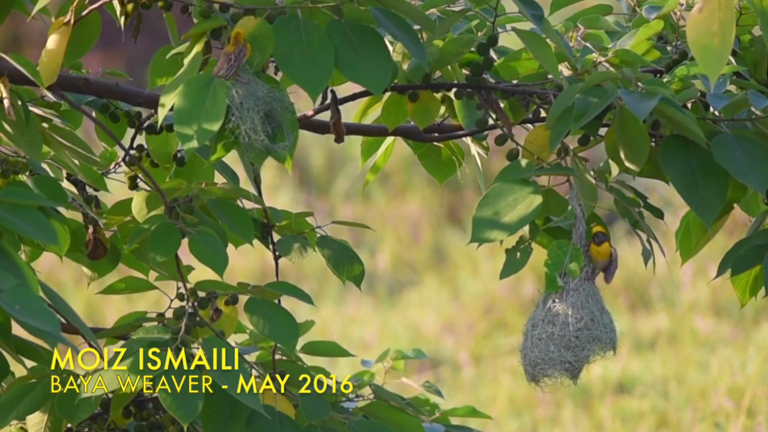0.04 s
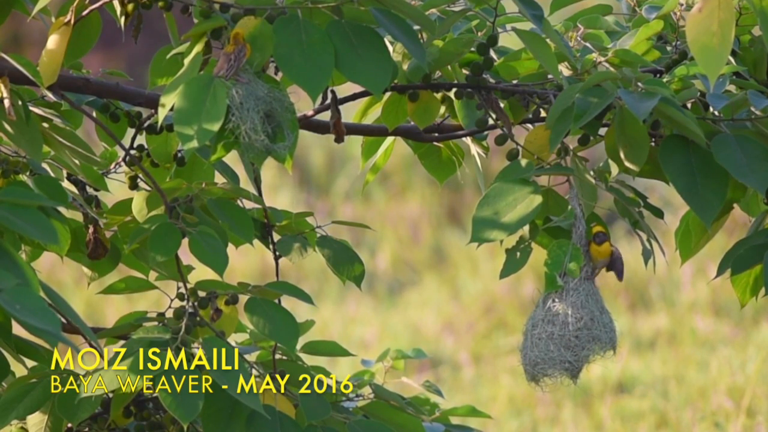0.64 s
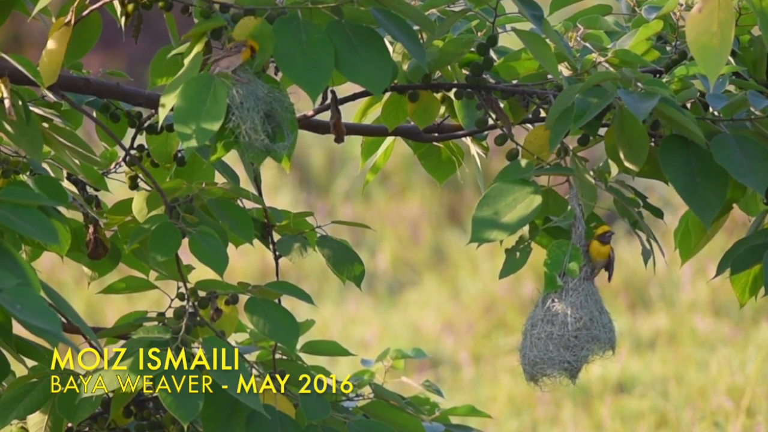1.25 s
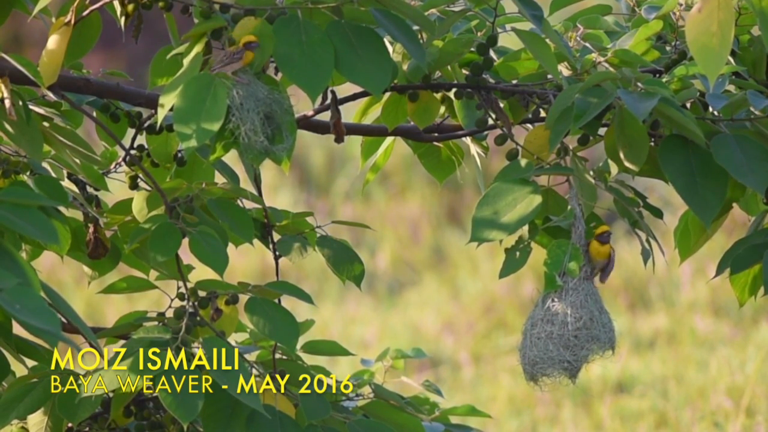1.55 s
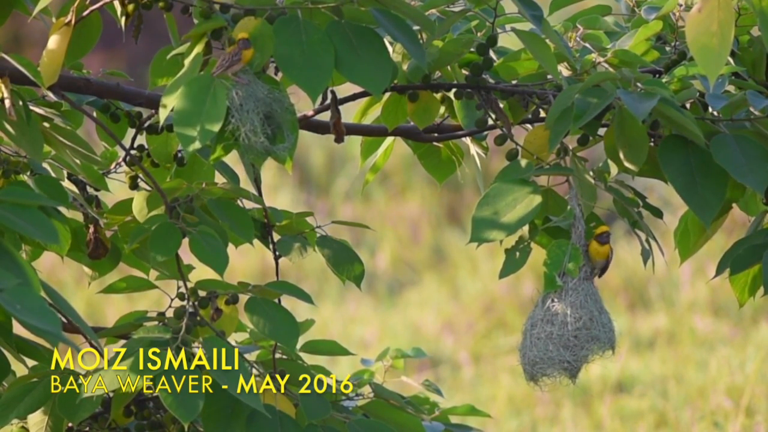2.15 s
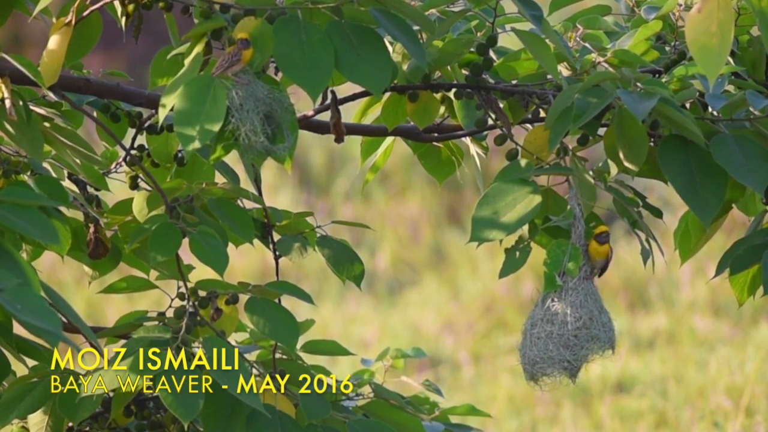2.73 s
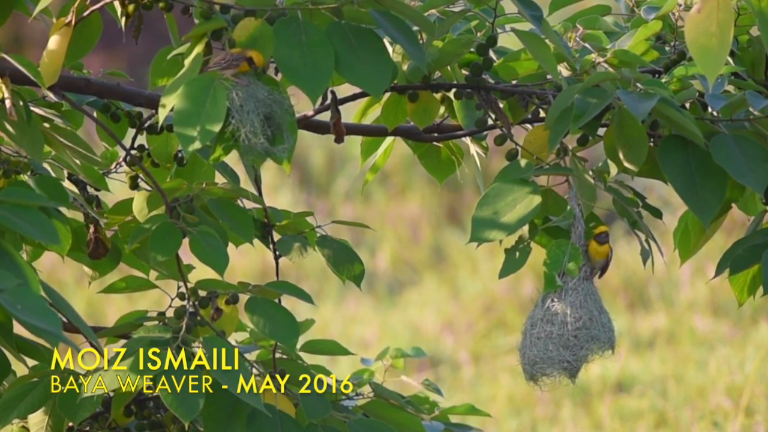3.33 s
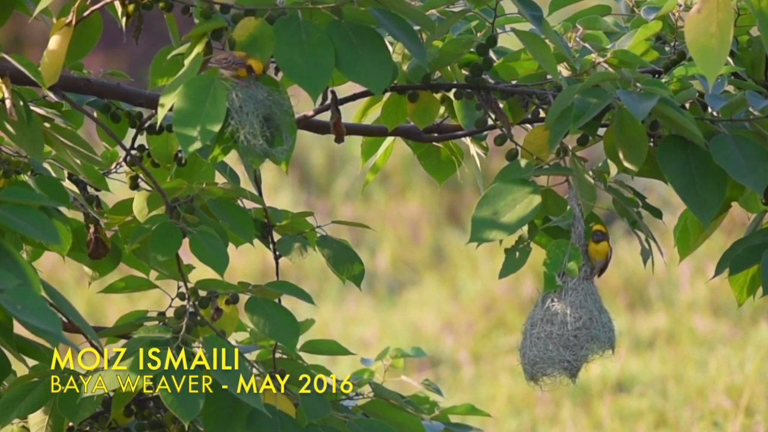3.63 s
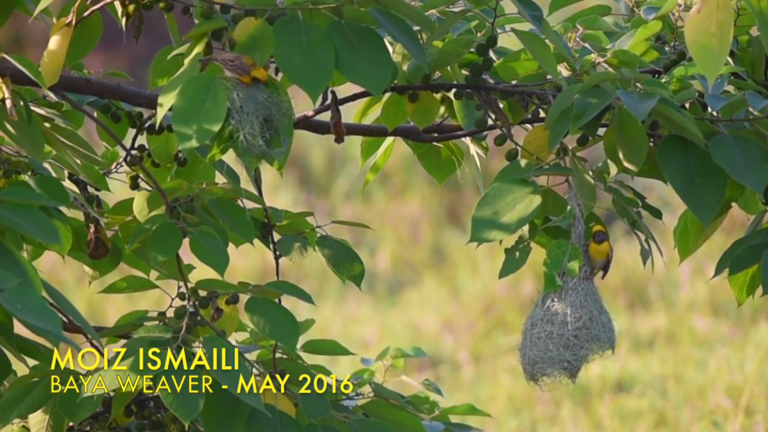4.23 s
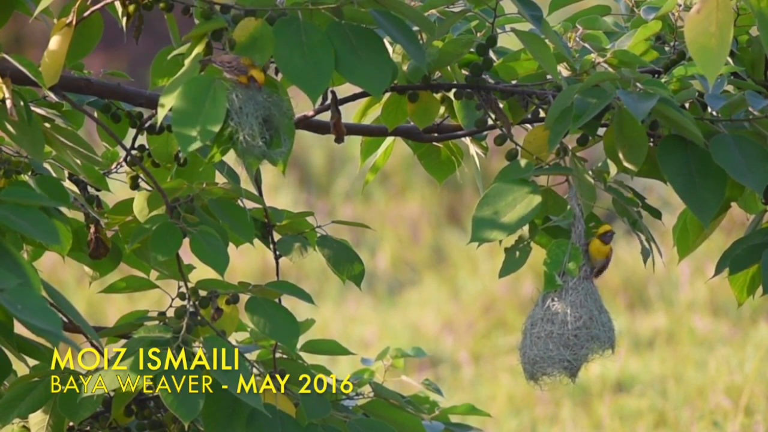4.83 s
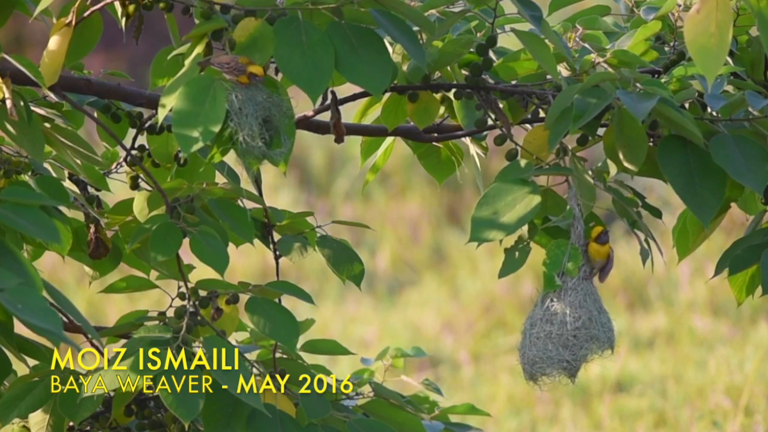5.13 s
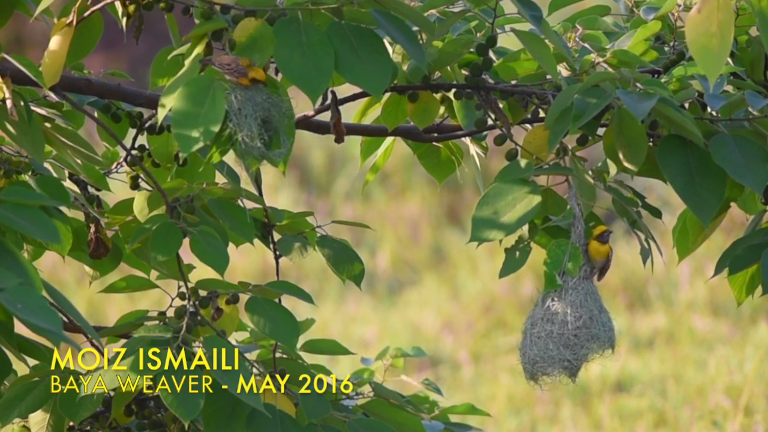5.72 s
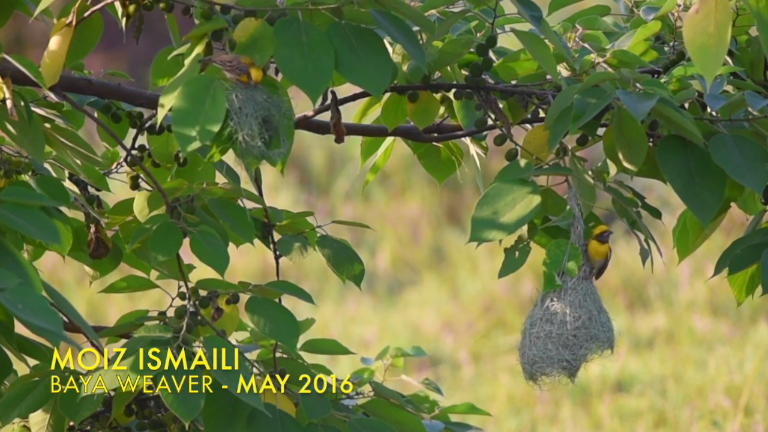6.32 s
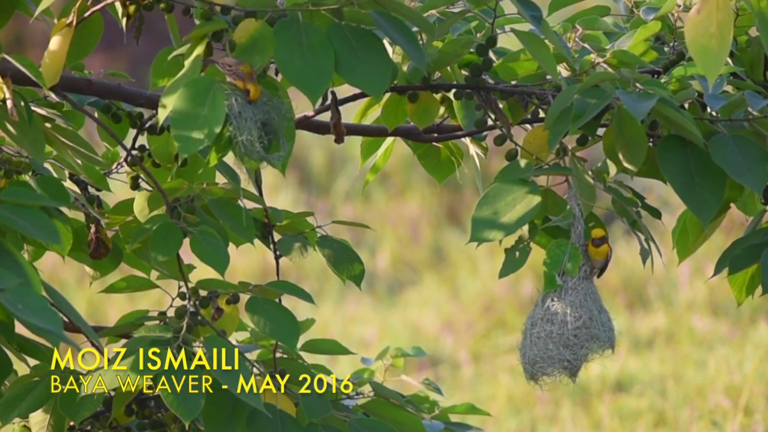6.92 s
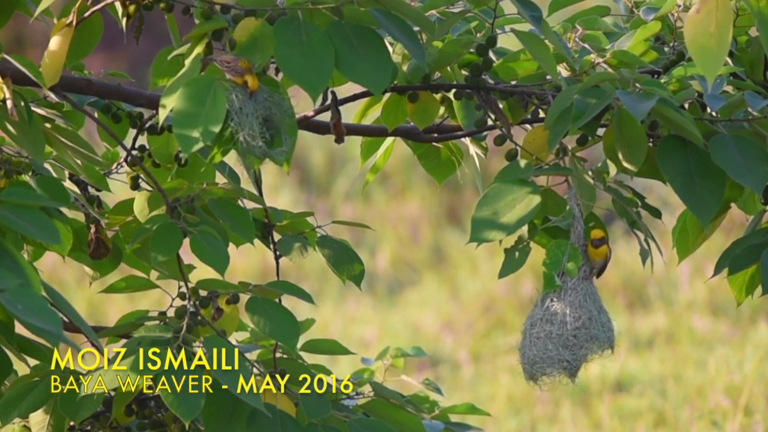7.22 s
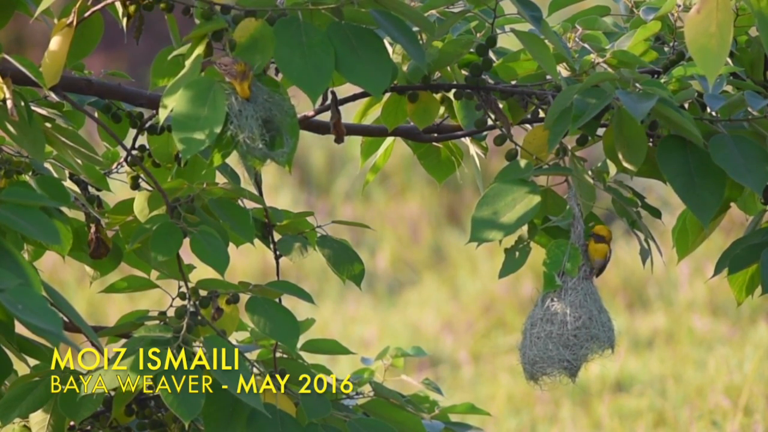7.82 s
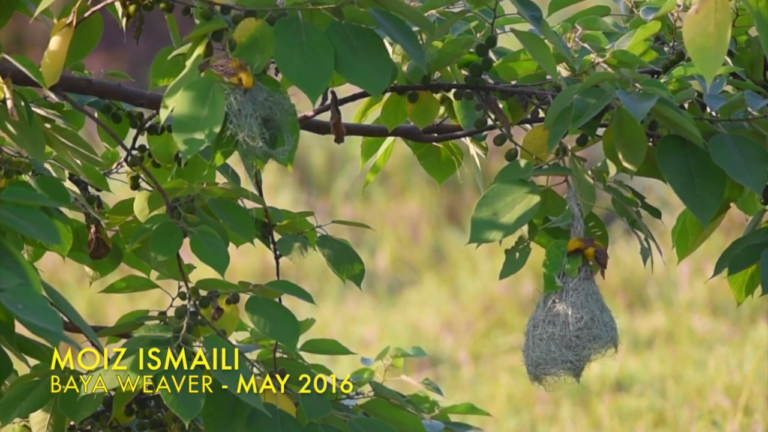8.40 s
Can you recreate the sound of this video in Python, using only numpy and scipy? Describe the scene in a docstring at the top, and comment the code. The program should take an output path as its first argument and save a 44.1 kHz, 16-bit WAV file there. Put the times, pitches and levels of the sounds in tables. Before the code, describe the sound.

Small birds chirp, rasp and twitter in a tree over distant traffic rumble, with camera shutter clicks and a couple of twig snaps.

```python
"""Weaver birds chirp, rasp, twitter and whistle in a leafy tree, with more of them further off.
Each sings with its syrinx, a two-sided voice box: one tone makes a clear note, two mixed make a rasp.
Leaves and branches scatter the calls. A stills camera fires two short bursts as small parts clack
inside its body, and dry twigs snap and tick close by. A high hiss swells: first rustling leaves, later
the breathy treble of the loud calls. Far traffic hums, rumbles and hisses below, and two motors rev up."""
import sys
import numpy as np
from scipy import signal
from scipy.fft import rfft, irfft, next_fast_len
from scipy.io import wavfile
from scipy.ndimage import uniform_filter1d

SR = 44100
rng = np.random.default_rng(int(sys.argv[2]) if len(sys.argv) > 2 else 0)


def waveform_to_disk(signal):
    """Save audio, clipped to [-1, 1], as 16-bit WAV at the path in sys.argv[1]."""
    frames = np.transpose(np.atleast_2d(signal))
    scaled = np.clip(frames, -1, 1) * 32767
    samples = np.round(scaled).astype(np.int16)
    wavfile.write(sys.argv[1], SR, samples)


N = 373086
T = np.arange(N) / SR

# A "colour" says how strong a sound is at each frequency, from low to high.
# colour of the outdoor hiss: f/Hz, level/dB
AIR_COLOUR = [(150, -29), (250, -3.5), (342, -11.5), (607, -9), (988, -6), (1240, -11.5), (2320, -16.5),
              (2670, -16.5), (4120, -23), (5160, -22.5), (5730, -15), (6590, -23), (9830, -15.5),
              (11700, -33), (16000, -35)]
# how much that hiss differs between the ears: f/Hz, level/dB against the part they share
AIR_WIDTH = [(60, -57), (110, -50), (200, -50), (380, -17), (700, -16.5), (1290, -5), (2380, 0), (4400, 2),
             (8120, 1.5), (15000, 1)]
# narrow bands of extra hiss: f/Hz, width/Hz, level/dB
HISS_BANDS = [(1069, 56, -70.5), (5780, 280, -78)]
# colour of the traffic rumble: f/Hz, level/dB
RUMBLE_COLOUR = [(12, -37), (20, -30), (32, -1.5), (49, -3), (97, 2.5), (147, -3), (182, -4), (211, -8),
                 (242, -12), (296, -20), (400, -25.5), (520, -38), (880, -120)]
# tones of the low hum: f/Hz, level/dB
HUM_TONES = [(60, -60.5), (100, -64.5), (180, -63.5)]
# colour of a motor's roar: f/Hz, level/dB
ROAR_COLOUR = [(200, 1.5), (320, 3), (600, -4), (1050, -1.5), (1600, -13), (3500, -13), (6000, -18),
               (12000, -27)]
# motors revving: t/s of the peak, half-width/s, f/Hz at the peak, climb/(octaves/s), relative level/dB
REVS = [(3.02, 0.26, 271.4, .5, -55.5), (8.44, 0.23, 439, 1.1, -52.5)]
# colour of the high hiss and of the twigs' echoes off the leaves: f/Hz, level/dB
BRIGHT_COLOUR = [(2000, -32), (6000, -11.5), (8000, -1.5), (10000, 0.5), (11500, -7), (16000, -20)]
# swells of high hiss (leaves, later breathy bird treble): t/s of the peak, half-width/s, relative level/dB
HISS_SWELLS = [(.1, 0.3, -60.5), (1.78, 0.25, -55), (2.9, 0.47, -60.5), (3.6, 0.11, -57), (4.9, .2, -68),
               (5.5, 0.098, -51.5), (6.0, .25, -63), (6.93, 0.13, -57), (7.65, .2, -58.5)]
# loud twig snaps: t/s, level/dB, left minus right/dB
SNAPS = [(0.96, -4, 2), (6.4244, -1, 1.5)]
# one colour for each snap: f/Hz, level/dB
SNAP_COLOURS = [
    [(120, -49), (200, -5), (380, -8), (635, -39), (950, -7), (1620, -8), (2250, 3.5), (3430, -9),
     (3760, -16), (5840, 0), (6520, -6), (7270, -7.5), (11300, -6.5), (16000, -20)],
    [(120, -21), (200, -7.5), (735, -18), (1210, -5.5), (1910, -21), (2250, -9), (2960, -3.5), (3560, -15),
     (4120, -8), (5420, -6), (6880, -11.5), (7680, -8.5), (11100, -7), (16000, -25.5)],
]
# the clearest ticks of twigs and dry grass: t/s, relative level/dB
TICKS = [(0.9942, -36), (2.879, -42.5), (3.654, -40), (5.6657, -33), (5.6808, -34), (5.7139, -37.5),
         (5.7594, -40.5), (5.8046, -23), (6.107, -34.5), (6.2372, -38.5), (6.2956, -37.5), (6.461, -41),
         (6.7894, -38)]
# colour of a tick: f/Hz, level/dB
TICK_COLOUR = [(470, -46), (800, -13), (1900, -20), (2800, -12.5), (3340, -27), (3930, -16), (6020, -15.5),
               (8990, -3.5), (16000, -19.5)]
# camera bursts: t/s of the first main clack, number of photos
BURSTS = [(1.746, 2), (4.6135, 3)]
# knocks of mirror, curtains and motor in one photo: t/s from the main clack, relative level/dB, decay/s
SHUTTER_KNOCKS = [(-.0525, -7, 0.0037), (-.041, -12.5, 0.0074), (-.025, -12, 0.0029), (-.021, -4.5, 0.0029),
                  (0, 0, 0.0047), (0.013, -20, 0.014), (0.0219, -9, 0.0065), (0.028, -15.5, .005),
                  (.035, -6, 0.0063), (.039, -20, 0.0022), (0.049, -15, 0.0034)]
# colour of the camera body: f/Hz, level/dB
CAMERA_COLOUR = [(350, -53), (600, -18.5), (1010, -4.5), (1370, -16.5), (1530, -4), (1830, -2.5),
                 (2270, -11), (3430, -6), (4220, -11.5), (6200, -7.5), (6730, -6.5), (7210, -3),
                 (9620, -12), (13600, -22), (16000, -40)]
# the tones in a clear bird note: multiple of the pitch, level/dB
PURE_TONES = [(1, -0.5), (2, -18), (3, -22), (4, -42)]
# in-between tones that make a note reedy: multiple of the pitch, level/dB
REED_TONES = [(.5, -13.5), (1.5, -5.5), (2.5, -12)]
# colour of the throat during a rasp: f/Hz, level/dB
THROAT_COLOUR = [(1000, -68), (2000, 7), (2600, -1), (3800, 4.5), (5200, 4), (6300, -1), (8000, -2.5),
                 (10000, 3), (12500, -8), (16000, -19)]
# soft glides of far birds: t/s, length/s, start f/Hz, end f/Hz, level/dB
FAR_CALLS = [(3.419, 0.29, 1200, 1350, -68.5), (5.803, .07, 4550, 4080, -54.5),
             (7.217, 0.18, 1247, 1238, -68), (7.382, 0.17, 1313, 1340, -63),
             (7.961, 0.061, 2510, 2140, -64), (8.196, .074, 2220, 1940, -64), (8.284, 0.1, 2120, 1600, -63)]
# short arched chirps: t/s, length/s, top f/Hz, rise time/s, level/dB, roughness from 0 to 1
CHIRPS = [(0.039, 0.079, 3860, .011, -54.5, 0), (1.702, 0.056, 4360, 0.027, -44.5, .2),
          (3.302, 0.075, 4170, 0.013, -55, 0.12), (4.017, .077, 3820, 0.021, -58, .03),
          (4.363, 0.049, 3830, 0.013, -65, 0.4), (5.059, 0.091, 3880, .012, -56, 0.22),
          (5.994, .078, 4090, .02, -40.5, .12), (6.67, .075, 3880, .012, -55.5, 0.02),
          (6.856, 0.11, 4045, .012, -45, .9), (6.994, .088, 4066, .018, -39.5, .6),
          (7.591, 0.098, 4190, .01, -40.5, 0.1)]
# faint chirps with two voices at once: t/s, level/dB
TWO_VOICED = [(1.526, -64), (2.953, -63), (3.943, -65)]
# notes that slide down: t/s, length/s, start f/Hz, level/dB
SLIDES = [(1.767, .055, 3320, -54), (2.041, .055, 5260, -59.5), (2.24, 0.029, 5700, -62),
          (2.36, 0.061, 6200, -61), (4.167, 0.029, 4370, -52.5), (4.861, 0.032, 3420, -54.5),
          (5.126, 0.04, 3900, -53.5), (5.169, 0.037, 3870, -54.5), (5.599, .035, 2880, -53.5),
          (5.889, 0.0099, 5430, -43), (6.767, 0.022, 6000, -49), (6.892, 0.019, 6300, -42),
          (6.934, .017, 4600, -46), (6.953, 0.038, 4065, -44.5), (7.084, 0.041, 3805, -46),
          (7.23, .014, 3200, -49.5), (7.941, 0.019, 4100, -52)]
# harsh chatter: t/s, length/s, lower voice f/Hz, sweep rate/Hz, level/dB, treble boost/dB
RASPS = [(1.674, .15, 2620, 53, -53, 6), (2.075, 0.058, 3054, 43, -48.5, 15.5),
         (3.155, 0.031, 2460, 71, -49, 8), (3.19, 0.027, 2790, 55, -47.5, 2),
         (3.214, 0.053, 2484, 74, -51, 2), (5.109, .083, 2600, 135, -59.5, 9),
         (5.624, 0.08, 2526, 106, -51.5, 11.5), (5.85, 0.12, 2617, 110, -48, 4),
         (6.072, 0.11, 2700, 111, -44.5, 2), (6.743, 0.089, 2753, 128, -51, 8),
         (6.866, 0.26, 2820, 99, -51, 7.5)]
# yelps within the chatter: t/s, length/s, start f/Hz, level/dB
YELPS = [(5.857, 0.039, 5330, -44.5), (6.088, 0.032, 5500, -36), (6.813, 0.041, 4820, -47.5),
         (6.909, .028, 5730, -45.5)]
# a yelp drops, holds and drops again: share of the length, share of the start pitch
YELP_SHAPE = [(0, 0.99), (.16, 1), (.33, .74), (.66, .7), (1, .58)]
# repeats of the twittered phrase: t/s, level/dB
TWITTERS = [(6.189, -50), (6.308, -47), (6.432, -47.5), (6.553, -48)]
# that phrase (an arch, a high flick, a small hook): t/s from its start, f/Hz, relative level/dB
TWITTER_SHAPE = [(0, 3400, -3.5), (.016, 4245, 0), (.038, 3150, 0.5), (.051, 3095, 0), (.06, 5150, 1.5),
                 (.069, 3145, -3), (.08, 2400, -12), (.089, 3900, -4), (0.103, 2080, -13)]
# path of the long rising whistle: t/s, f/Hz, level/dB
WHISTLE_PATH = [(7.265, 3110, -54), (7.287, 3026, -44.5), (7.379, 3400, -40.5), (7.403, 3550, -55),
                (7.425, 3621, -42.5), (7.587, 3655, -41), (7.643, 3820, -42), (7.681, 3620, -34),
                (7.747, 3515, -53.5), (7.809, 3630, -70), (7.88, 3604, -56)]


def undb(db):
    """Turn decibels into a number to multiply by."""
    return 10 ** (np.asarray(db) / 20)


def unit(x):
    """Scale a sound to an average strength (rms) of one."""
    return x / np.sqrt(np.mean(x ** 2) + 1e-20)


def gains(points, size):
    """Turn a colour into one multiplier for each frequency."""
    hz, db = np.transpose(points)
    frequencies = np.arange(size // 2 + 1) * SR / size
    return undb(np.interp(np.log(frequencies + 1), np.log(hz), db))


def colour(x, points):
    """Filter a sound to give it a colour."""
    size = next_fast_len(x.shape[-1])
    return irfft(rfft(x, size) * gains(points, size), size)[..., :x.shape[-1]]


def knock(points, size=512):
    """How a body with this colour rings after one sharp tap."""
    cepstrum = irfft(np.log(gains(points, size)))
    cepstrum[1:size // 2] *= 2  # folding it in half puts all the ringing after the tap
    cepstrum[size // 2 + 1:] = 0
    ring = irfft(np.exp(rfft(cepstrum)))
    return ring / np.linalg.norm(ring)


def wander(size, rate):
    """A random wobble that heads for a new value `rate` times a second."""
    at = np.arange(size) * rate / SR
    values = rng.standard_normal(max(size // 8, 64))
    return np.interp(at, np.arange(len(values)), values)


def add(out, s, x):
    """Mix a sound in, starting at s seconds."""
    i = max(int(s * SR), 0)
    out[..., i:i + x.shape[-1]] += x[..., :N - i]


def turn(hz):
    """The angle (phase) a wave has turned through as its pitch moves."""
    return 2 * np.pi * np.cumsum(hz) / SR


def bump(s, half_width):
    """A smooth swell that reaches one at s seconds."""
    return np.exp(-((T - s) / half_width) ** 2)


def arch(length, start, middle, end):
    """A pitch curve through three points, and a swell that fades the note in and out."""
    u = np.linspace(0, 1, int(length * SR))
    curve = np.polyfit([0, .5, 1], [start, middle, end], 2)
    return np.polyval(curve, u), np.abs(np.sin(np.pi * u)) ** 0.43


def contour(u, places, values, smooth=0.047):
    """A line through a few points, its corners rounded over a share of its length."""
    return uniform_filter1d(np.interp(u, places, values), max(int(smooth * len(u)), 1), mode="nearest")


def foliage(x, near_db, far_db, near_s=0.02, far_s=0.08):
    """Quick echoes from nearby leaves and a faint tail from other trees, different at each ear."""
    t = T[:SR // 2]
    echoes = sum(undb(db) * np.exp(-t / s) * np.sqrt(2 / (s * SR)) * rng.standard_normal((2, len(t)))
                 for db, s in ((near_db, near_s), (far_db, far_s)))
    return signal.fftconvolve(np.atleast_2d(x), echoes, axes=1)[:, :N]


def traffic(air_db=-57.5, rumble_db=-52.56):
    """Far traffic: a wide, soft hiss, plus a rumble and a hum that both ears share."""
    duller = [(hz, db - 6 * (hz > 7000)) for hz, db in AIR_COLOUR]
    shared, side = colour(rng.standard_normal((2, N)), duller)
    air = (shared + colour(side, AIR_WIDTH) * np.array([[1], [-1]])) / shared.std()
    air *= undb(air_db + .5 * wander(N, 3.21))
    for hz, width, db in HISS_BANDS:
        band = signal.iirpeak(hz, hz / width, SR)
        air += undb(db) * unit(signal.lfilter(*band, rng.standard_normal((2, N))))
    rumble = unit(colour(rng.standard_normal(N), RUMBLE_COLOUR)) * undb(rumble_db)
    hum = sum(np.sqrt(2) * undb(db) * np.sin(turn(hz * (1 + 0.01232 * wander(N, 12))))
              for hz, db in HUM_TONES)
    return air + rumble + hum


def motors(roar_db=1, tone_db=-2, full_revs_hz=444):
    """Blurred engine notes climb as they swell and fade; the roar grows steeply with the revs."""
    out = np.zeros(N)
    for s, width, hz, climb, db in REVS:
        pitch = hz * 2 ** (climb * np.clip(T - s, -1, 1))
        tone = np.sin(turn(pitch * (1 + 0.094 * wander(N, 140)))) * (1 + 0.47 * wander(N, 60))
        roar = unit(colour(rng.standard_normal(N), ROAR_COLOUR)) * (pitch / full_revs_hz) ** 2
        out += undb(db) * bump(s, width) * (undb(tone_db) * tone + undb(roar_db) * roar)
    return out


def high_hiss(rest_db=-65.5, trim_db=-1, flicker_db=3.5):
    """Swells of high, flickering hiss: leaf rustle, and later the breathy treble of the loud bird calls."""
    power = undb(rest_db) ** 2 + sum((undb(db) * bump(s, width)) ** 2 for s, width, db in HISS_SWELLS)
    hiss = unit(colour(rng.standard_normal((2, N)), BRIGHT_COLOUR))
    return hiss * np.sqrt(power) * undb(trim_db + flicker_db * wander(N, 90))


def crack(points, splinter, decay_s):
    """Dry wood breaks with one sudden push, then its fibres splinter briefly and brightly."""
    t = T[:SR // 30]
    fibres = splinter * np.exp(-t / decay_s) * rng.standard_normal((2, len(t)))
    push = signal.sosfilt(signal.butter(2, 2800, "high", fs=SR, output="sos"), fibres)
    push[0, 0] += 1
    push[1, 5] += 1  # the break reaches the right ear five samples later
    body = knock(points)
    return signal.fftconvolve(push, body[None] / abs(body).max(), axes=1)


def twigs(faint_count=14, faint_db=-51, spread_db=7, tick_boost_db=3.5):
    """Twigs break close by: two loud snaps and many small ticks, echoed by the leaves."""
    snaps, ticks = np.zeros((2, N)), np.zeros((2, N))
    for (s, db, pan_db), points in zip(SNAPS, SNAP_COLOURS):
        ear_gains = undb(db + np.array([[pan_db], [-pan_db]]) / 2)
        add(snaps, s, ear_gains * crack(points, splinter=0.16, decay_s=0.0016))
    faint = [(when * T[-1], faint_db + spread_db * loud) for when, loud in rng.random((faint_count, 2))]
    for s, db in TICKS + faint:
        tick = crack(TICK_COLOUR, splinter=0.45, decay_s=0.0022)
        add(ticks, s + 0.0009, undb(db + tick_boost_db) * tick)
    direct = snaps + ticks
    return direct + foliage(colour(direct, BRIGHT_COLOUR), near_db=-9, far_db=-22, near_s=0.019)


def camera(force_db=-28.5, photo_gap_s=.2, pan_db=4, lag_samples=6):
    """Each photo sets off the same run of rattling knocks in the camera body, a little to the left."""
    force, t = np.zeros(N), T[:SR // 16]
    for start, count in BURSTS:
        for s in start + photo_gap_s * np.arange(count):
            for delay, part_db, decay in SHUTTER_KNOCKS:
                add(force, s + delay, undb(force_db + part_db) * np.exp(-t / decay))
    rattle = force * unit(rng.standard_normal(N) + 0.71 * rng.standard_normal((2, N)))
    left, right = signal.fftconvolve(rattle, knock(CAMERA_COLOUR)[None], axes=1)[:, :N]
    direct = np.array([left * undb(pan_db / 2), np.roll(right, lag_samples) * undb(-pan_db / 2)])
    return direct + foliage(left, near_db=-14.0, far_db=-21.0)


def syrinx(hz, reedy, rough, overtones_db=0, shimmer=0.15):
    """A bird's nearly pure tone; `reedy` adds in-between tones, `rough` shakes pitch and loudness."""
    hz = hz * (1 + 0.0016 * wander(len(hz), 161.0) + 0.099 * rough * wander(len(hz), 900))
    phase = turn(hz)
    pure, reed = (sum(undb(db + overtones_db * (k > 1)) * np.sin(k * phase) * (k * hz < SR / 2)
                      for k, db in tones) for tones in (PURE_TONES, REED_TONES))
    flutter = 1 + (shimmer + 0.38 * rough) * wander(len(hz), 300)
    return np.sqrt(2) * (pure + reedy * reed) * flutter


def rasp(length, pitch, sweep_rate, treble_db, depth=0.35, waver=0.083, jitter=0.0346, high_db=-5):
    """Both sides of the syrinx sound at once, wavering and falling in quick sweeps, and mix harshly."""
    size = int(length * SR)
    cycle = turn(sweep_rate * (1 + .25 * wander(size, 100))) / (2 * np.pi) % 1
    fall = depth * (.5 - cycle)
    low = turn(pitch * (1 + 0.544 * fall + waver * wander(size, 70) + jitter * wander(size, 691)))
    high = turn(1.6 * pitch * (1 + fall + waver * wander(size, 90) + jitter * wander(size, 1200)))
    # the membranes close against each other, and the air pulses with every sweep
    valve = np.maximum(np.sin(low) + 0.49 * np.cos(2 * low) + undb(high_db) * np.sin(high), -.6)
    flow = (1.2 + np.sin(np.pi * cycle)) * undb(2.0 * wander(size, 148.0))
    sound = colour(valve * flow, [(hz, db + treble_db * (hz > 6000)) for hz, db in THROAT_COLOUR])
    return unit(sound) * signal.windows.tukey(size, .2)


def colony(count=26, quietest_db=-72, spread_db=4):
    """Other weavers further off chirp at random, heard only as echoes through the trees."""
    out = np.zeros(N)
    for when, long, high, bend, loud in rng.random((count, 5)):
        middle = 2600 + 2200 * high
        hz, swell = arch(0.028 + .04 * long, middle * (.7 + 0.64 * bend), middle, middle * 0.57)
        note = swell * syrinx(hz, reedy=0.44, rough=0.51)
        add(out, when * (T[-1] - .1), undb(quietest_db + spread_db * loud) * note)
    return foliage(out, near_db=7.5, far_db=-5)


def far_calls():
    """Far birds sing soft notes that glide evenly from one pitch to another."""
    out = np.zeros(N)
    for s, length, start, end, db in FAR_CALLS:
        hz, swell = arch(length, start, (start + end) / 2, end)
        add(out, s, undb(db) * swell * syrinx(hz, reedy=0, rough=.089))
    return out


def chirps(scoop=.33, sag=.24):
    """Calls to keep in touch: a fast rise and a slower fall, reedier when louder; a few have two voices."""
    out = np.zeros(N)
    for s, length, top, rise, db, rough in CHIRPS:
        u = np.linspace(0, 1, int(length * SR))
        shape = (1 - scoop * np.exp(-u * length / rise)) * (1 - sag * u ** 1.805)
        reedy = 0.7 + 0.01 * (db + 46)
        tone = syrinx(top * shape / shape.max(), reedy, rough, overtones_db=-3)
        add(out, s, undb(db) * np.abs(np.sin(np.pi * u)) ** 0.6 * tone)
    for s, db in TWO_VOICED:
        for top_hz, edge, reedy in ((3830, .86, .6), (4500, .95, 0)):  # an arch under a flatter note
            hz, swell = arch(0.039, edge * top_hz, top_hz, edge * top_hz)
            add(out, s, undb(db) * swell * syrinx(hz, reedy, rough=.18))
    return out


def slides():
    """Notes that slide down to about half their starting pitch, quickly or slowly."""
    out = np.zeros(N)
    for s, length, top, db in SLIDES:
        hz, swell = arch(length, top, .82 * top, 0.52 * top)
        add(out, s, undb(db) * swell * syrinx(hz, reedy=0.28, rough=0.39))
    return out


def scolding():
    """The birds scold with harsh rasps and a few falling yelps."""
    out = np.zeros(N)
    for s, length, pitch, sweep_rate, db, treble_db in RASPS:
        add(out, s, undb(db) * rasp(length, pitch, sweep_rate, treble_db))
    for s, length, top, db in YELPS:
        u = np.linspace(0, 1, int(length * SR))
        hz = top * contour(u, *np.transpose(YELP_SHAPE), smooth=.12)
        add(out, s, undb(db) * signal.windows.tukey(len(u), .3) * syrinx(hz, reedy=0.22, rough=0.34))
    return out


def twitter(rasp_after_s=0.073, rasp_db=-9.5):
    """A bird repeats one quick phrase, with a soft rasp under its end."""
    out = np.zeros(N)
    at, hz, phrase_db = np.transpose(TWITTER_SHAPE)
    t = np.arange(0, at[-1], 1 / SR)
    for s, db in TWITTERS:
        tone = syrinx(contour(t, at, hz), reedy=0.27, rough=0.17)
        add(out, s, undb(db + contour(t, at, phrase_db)) * tone)
        buzz = rasp(length=0.051, pitch=2660, sweep_rate=87, treble_db=2)
        add(out, s + rasp_after_s, undb(db + rasp_db) * buzz)
    return out


def whistle(waver=.005, waver_hz=80):
    """One long, clean note that climbs, wavers a little and swells before it dies away."""
    out = np.zeros(N)
    s, hz, db = np.transpose(WHISTLE_PATH)
    t = np.arange(s[0], s[-1], 1 / SR)
    pitch = np.interp(t, s, hz) * (1 + waver * wander(len(t), waver_hz))
    tone = syrinx(pitch, reedy=0, rough=.03, overtones_db=-8, shimmer=.14)
    add(out, s[0], undb(np.interp(t, s, db)) * tone * signal.windows.tukey(len(t), .03))
    return out


def birds(chatter_pan_db=-0.5, whistle_pan_db=2):
    """All the calls, scattered by leaves and branches; the whistler sits a little to the left."""
    chatter = chirps() + slides() + far_calls() + scolding() + twitter()
    long_note = whistle()
    sides = np.array([[.5], [-.5]])
    direct = chatter * undb(chatter_pan_db * sides) + long_note * undb(whistle_pan_db * sides)
    echoes = foliage(chatter + long_note, near_db=-5.5, far_db=-8.0, near_s=0.024, far_s=0.056)
    return direct + echoes + colony()


def scene():
    """Birds, camera and twigs over the outdoor background, in stereo."""
    return birds() + camera() + twigs() + high_hiss() + traffic() + motors()


def record(dry):
    """Round off the loudest peaks and cut the treble above 16100 Hz."""
    treble_cut = signal.ellip(8, .2, 70, 16100, fs=SR, output="sos")
    return signal.sosfilt(treble_cut, np.tanh(dry))


dry = scene()
out = record(dry)
waveform_to_disk(out)
```